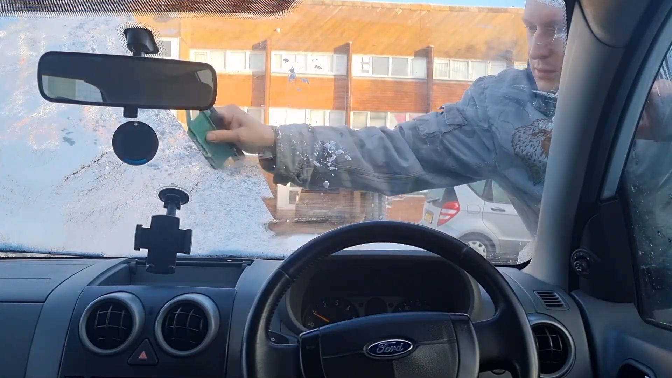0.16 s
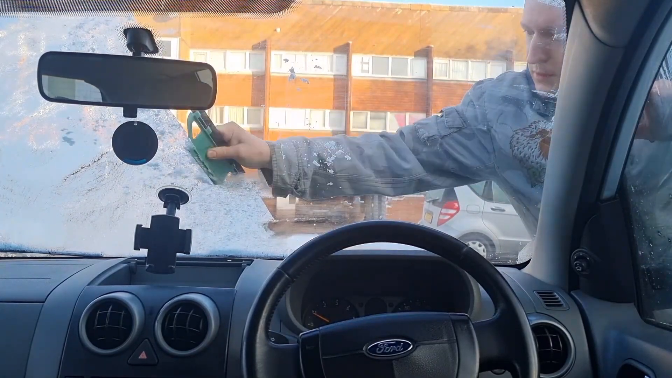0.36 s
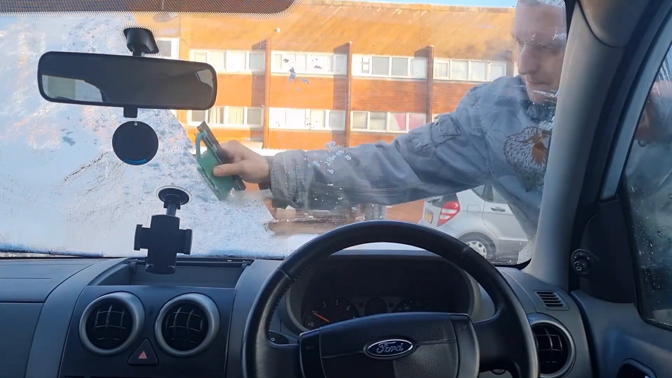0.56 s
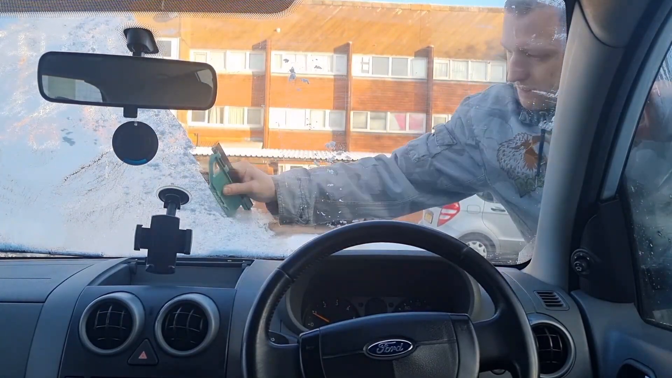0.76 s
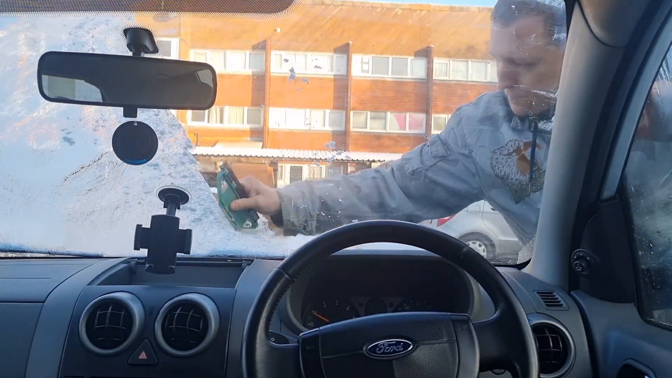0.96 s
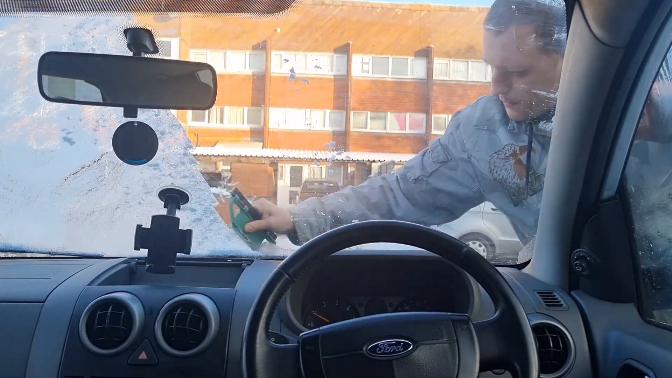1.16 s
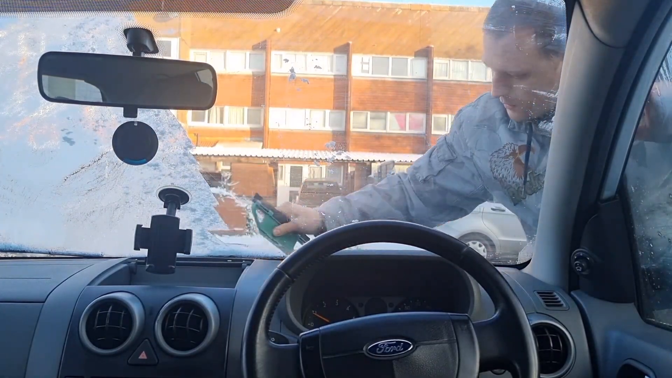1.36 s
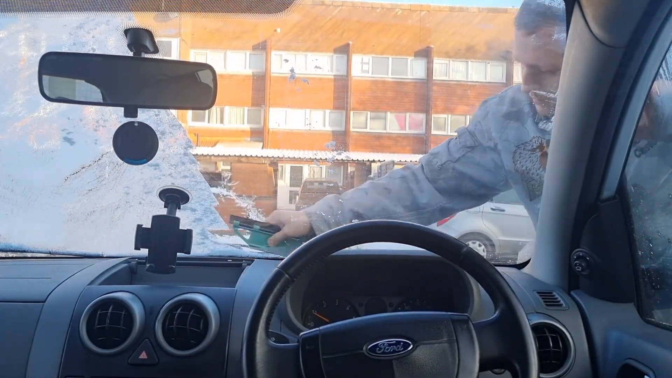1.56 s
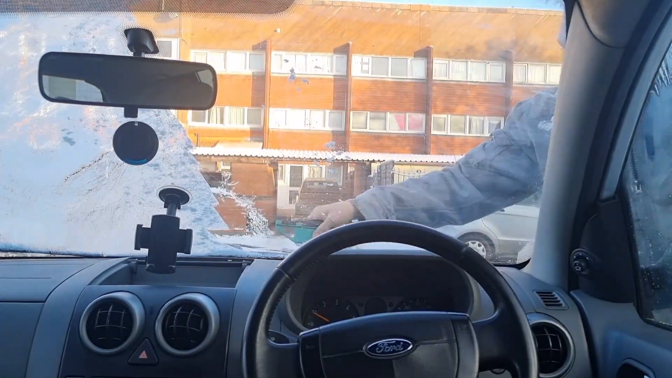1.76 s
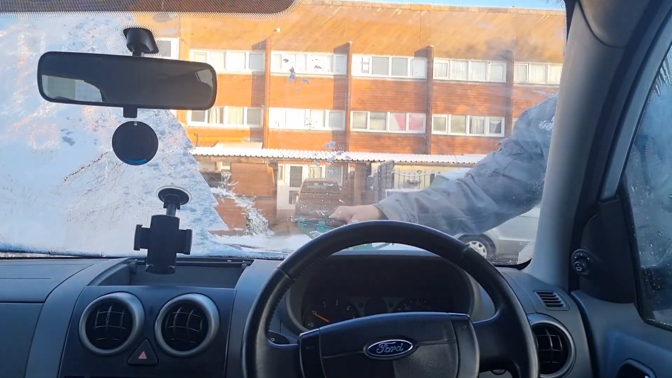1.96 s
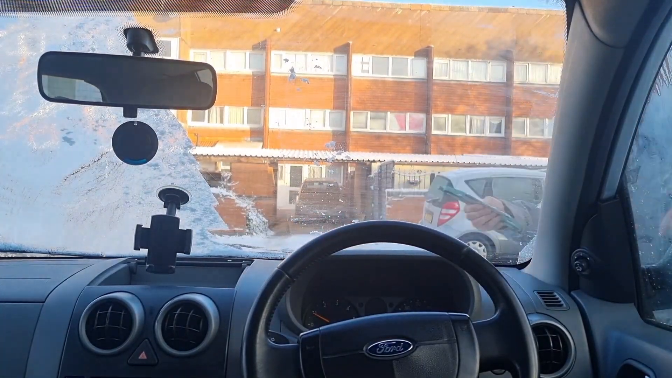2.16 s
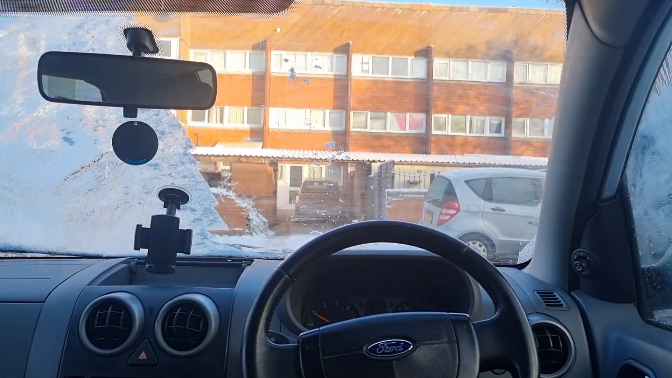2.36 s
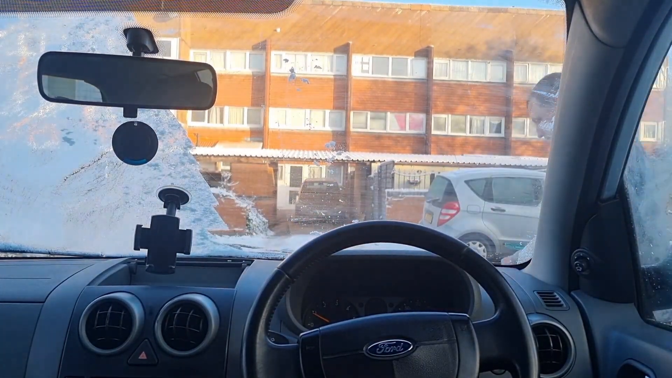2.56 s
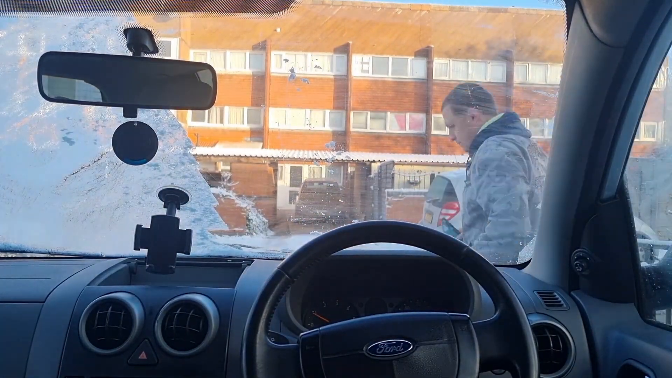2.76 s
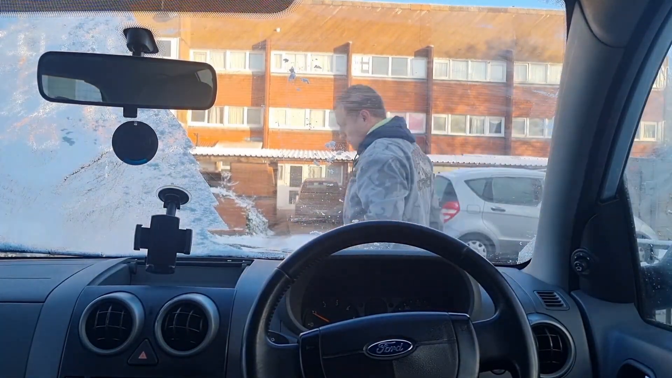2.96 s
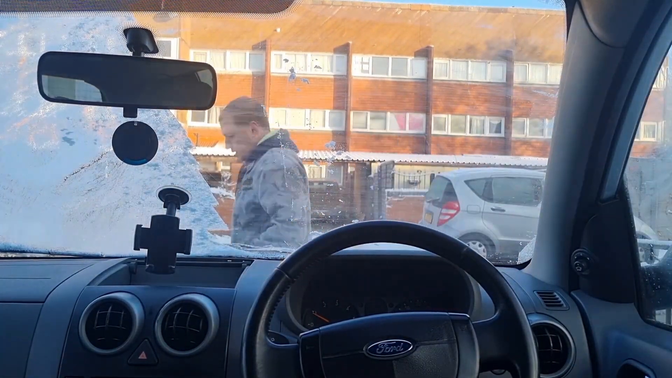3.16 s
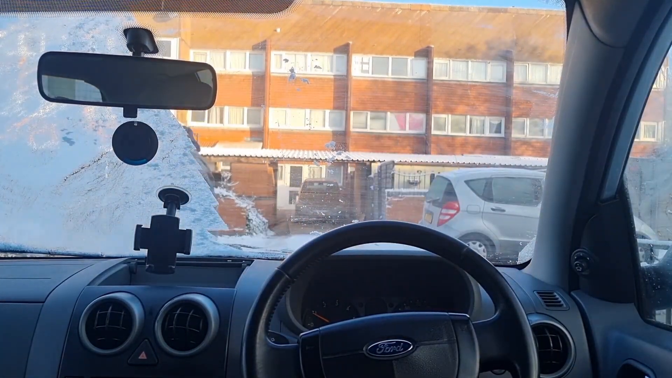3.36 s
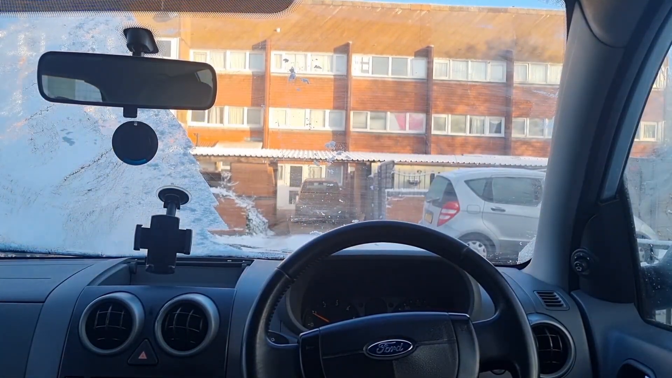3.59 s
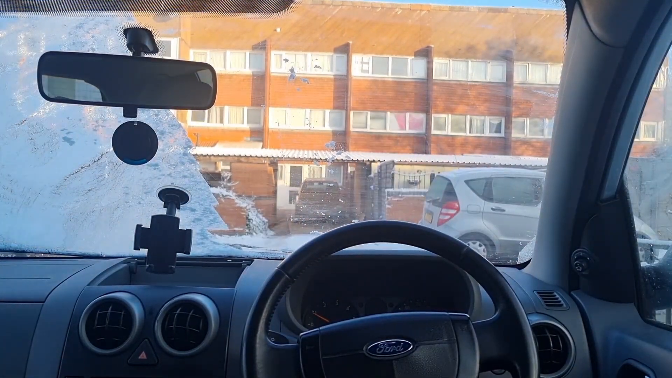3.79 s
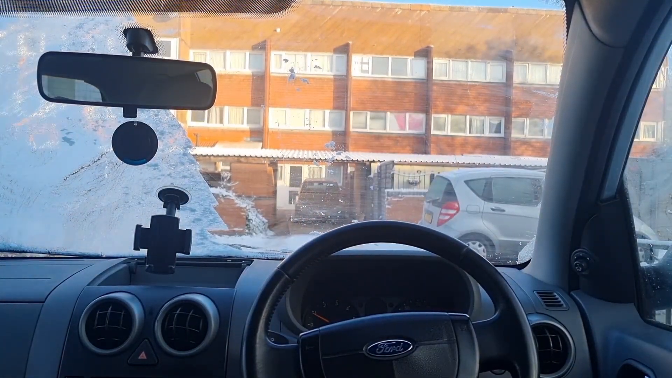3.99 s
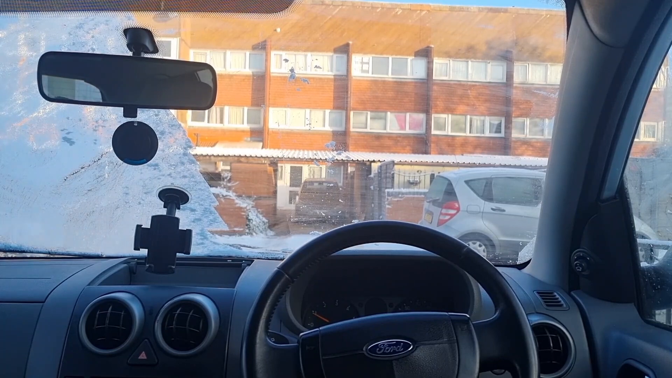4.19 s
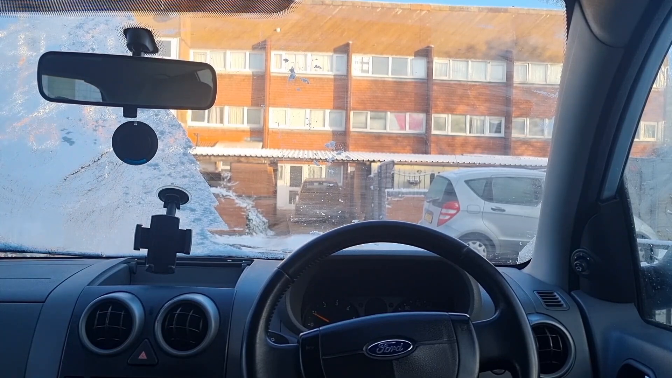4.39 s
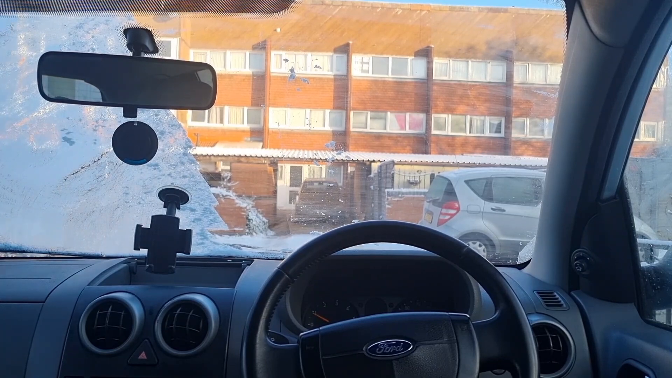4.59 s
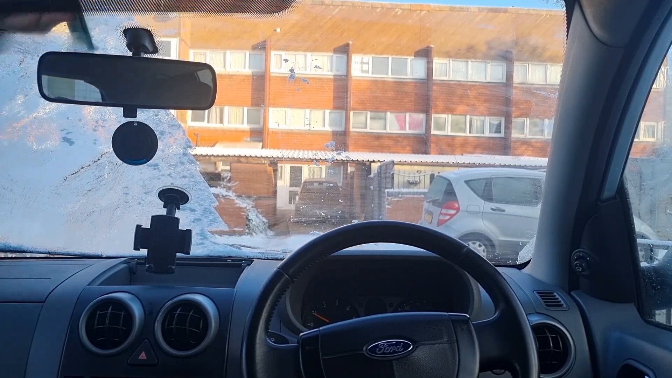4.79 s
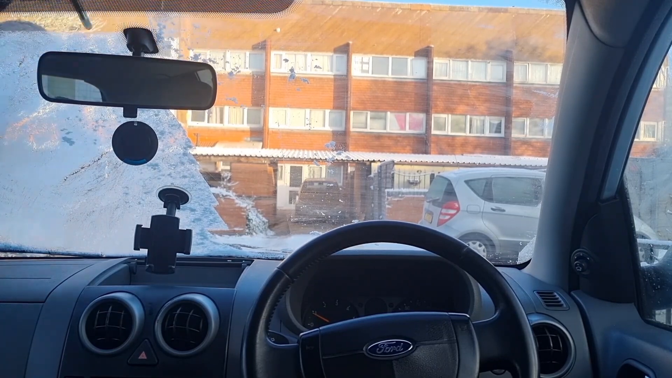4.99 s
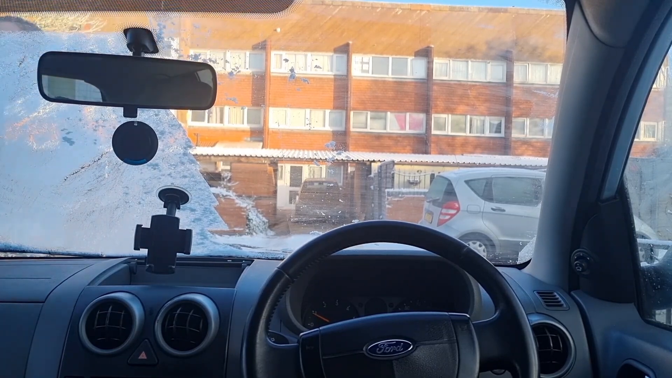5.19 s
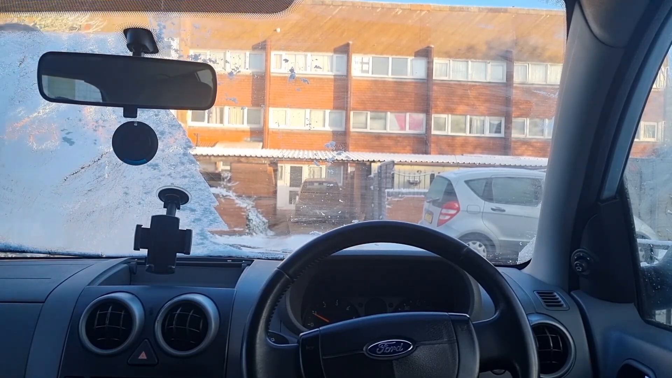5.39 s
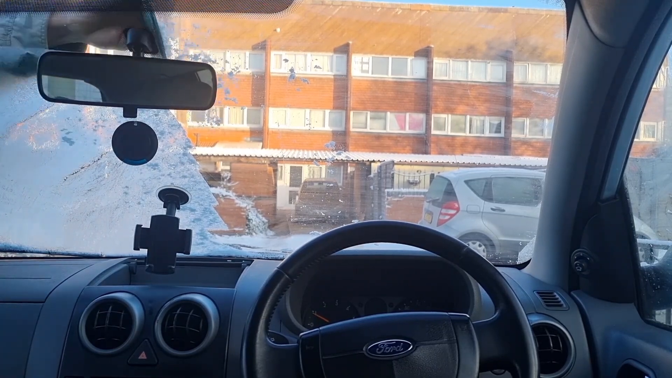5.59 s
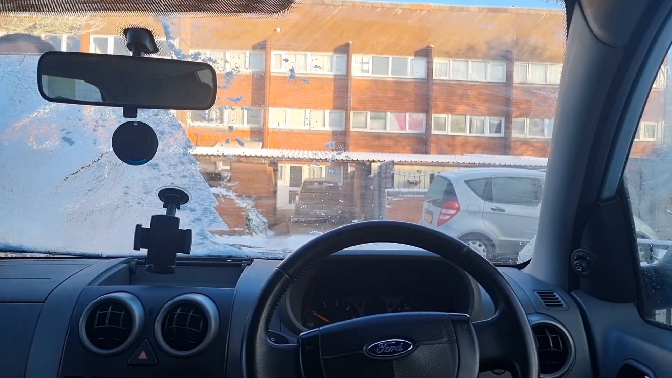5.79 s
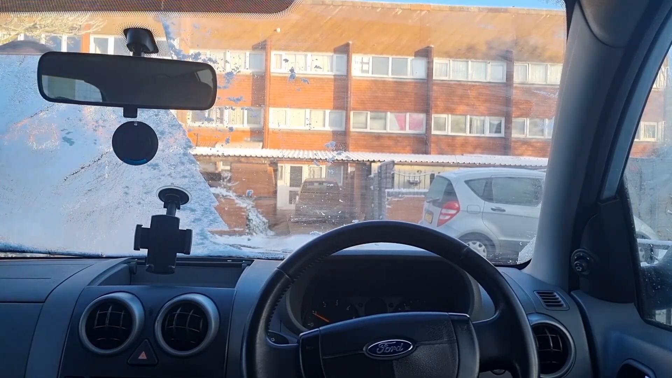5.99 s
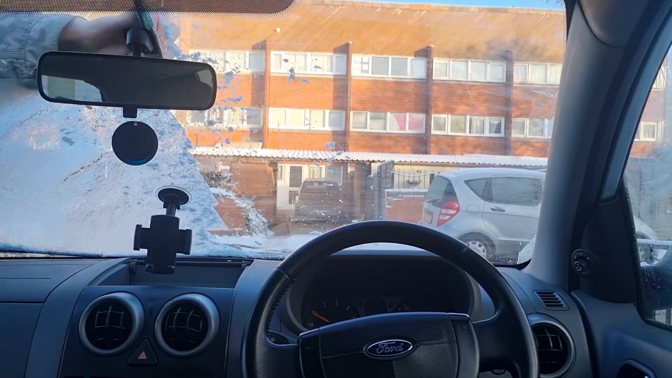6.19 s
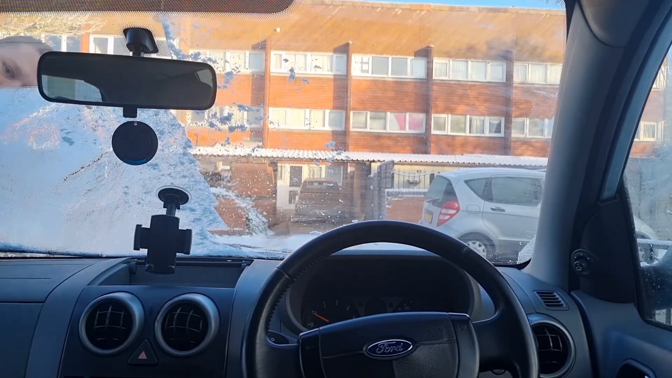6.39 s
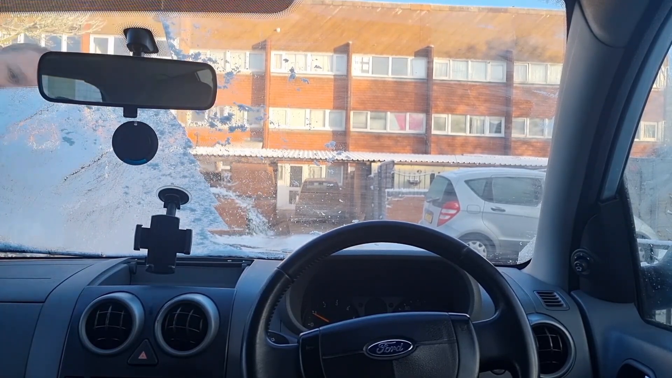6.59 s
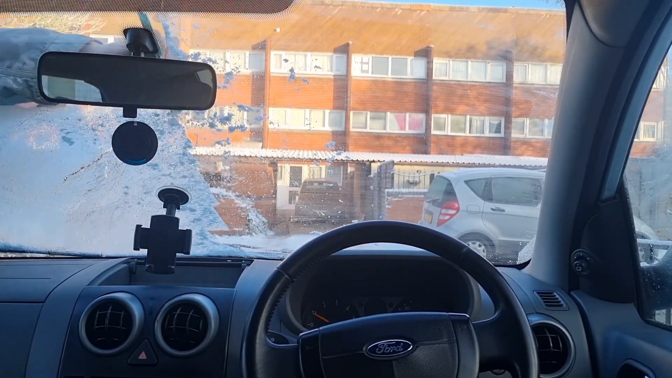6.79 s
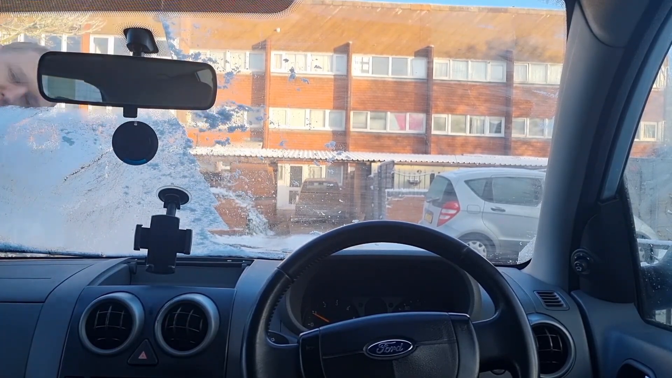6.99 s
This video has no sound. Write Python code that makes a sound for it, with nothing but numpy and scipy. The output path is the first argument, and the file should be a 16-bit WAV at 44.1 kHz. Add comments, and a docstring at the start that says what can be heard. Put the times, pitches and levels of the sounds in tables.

```python
"""A plastic scraper clears frost from a windscreen, heard from inside the idling car.
Random ice fractures, shaped by the blade's speed, ring the glass: quick push-pull strokes, a pause, long sweeps.
Snags on hard ice add cracks, rings and thuds; a double knock on the trim falls near the end of the strokes.
Below lie the engine's wavering firing orders, rumble and thin whine, and the low boom of the cabin air."""
import sys
import numpy as np
from scipy import signal
from scipy.fft import rfft, irfft, next_fast_len
from scipy.io import wavfile
from scipy.ndimage import uniform_filter1d, map_coordinates

SR = 44100
rng = np.random.default_rng(int(sys.argv[2]) if len(sys.argv) > 2 else 0)


def to_wav(s):
    """Save 16-bit WAV."""
    ch = np.atleast_2d(s).T  # columns
    pcm = np.round(np.clip(ch, -1, 1) * 32767)  # PCM
    wavfile.write(sys.argv[1], SR, pcm.astype(np.int16))


N = 310905

# Quick to-and-fro strokes. Each row: start in seconds, push length in seconds, push level in dB,
# return length in seconds, return level in dB.
QUICK_STROKES = [(0.022, 0.085, -38, 0.078, -42.0), (0.193, 0.086, -41.0, 0.079, -47),
                 (0.376, 0.083, -40.5, 0.088, -48.5), (0.57, 0.086, -41, 0.082, -44.5),
                 (0.762, 0.087, -35, 0.093, -41), (0.968, 0.082, -34.0, 0.1, -46),
                 (1.182, 0.094, -36, 0.078, -42), (1.408, 0.094, -33.5, 0.1, -47),
                 (1.63, 0.1, -39.5, 0.1, -55.5), (1.811, 0.1, -46, 0.065, -50.5),
                 (2.008, 0.053, -38, 0.018, -65), (2.081, 0.062, -47.5, 0.062, -51.5),
                 (2.221, 0.057, -40, 0.055, -56.7)]
# Long sweeps and light touches between them. Each row: start in seconds, length in seconds,
# level in dB, fizz in dB re level.
LONG_SWEEPS = [(4.474, 0.075, -50.5, -24.5), (4.537, 0.061, -61, -22), (4.63, 0.51, -38, -11.5),
               (5.122, 0.11, -55.5, -17.7), (5.207, 0.23, -42.5, -11), (5.417, 0.094, -47, -12),
               (5.492, 0.064, -36.5, -12.5), (5.545, 0.33, -39, -7), (5.924, 0.3, -42.5, -8),
               (6.207, 0.28, -36, -8.5), (6.523, 0.3, -39.5, -8.5), (6.812, 0.293, -35.0, -7.5)]
# The blade lands or snags on hard ice. Each row: time in seconds, strength in dB, ring centre in Hz,
# ring trim in dB, thud trim in dB; snags() adds an overall level to crack, ring and thud.
ICE_SNAGS = [(0.044, -12.5, 2450, -11, -30), (0.231, -17, 2300, -9, -14), (1.251, -24.5, 2700, -10, -4.5),
             (4.501, -41, 820, 10, 7), (4.874, -23.5, 2450, -2, -8), (4.946, -21.5, 700, -6.5, -5),
             (5.283, -31, 1200, 6, 1.5), (5.693, -18.5, 1160, -1.5, -6), (6.316, -14, 2400, -7, -20),
             (6.908, -12.5, 2600, -16, -20.5)]
# The scraper bumps the trim below the glass. Each row: time in seconds, level in dB.
TRIM_KNOCKS = [(2.122, -29), (2.132, -23.5)]
# Modes of the trim. Each row: frequency in Hz, level in dB, t60 in seconds.
TRIM_MODES = [(183, -3, 0.082), (358, 0, 0.056), (419, 1.5, 0.064), (538, -3, 0.025), (670, -1.5, 0.028),
              (760, -6, 0.032), (1260, -16, 0.042)]
# Modes of blade and glass pressed together. Each row: frequency in Hz, level in dB, t60 in seconds.
BLADE_MODES = [(687, 3, 0.049), (842, -1.5, 0.057), (1110, -2.5, 0.037), (1190, -7, 0.053), (2050, 0, 0.03),
               (2424, -3, 0.047), (2710, -8, 0.035)]
# Low resonances of the windscreen. Each row: centre in Hz, width in Hz, level in dB.
GLASS_MODES = [(471, 65, -0.5), (770, 93, 5), (878, 165, -3.5), (1221, 237, 5), (1760, 380, -10)]
# Spectra, level set elsewhere. Each row: frequency in Hz, relative density in dB per Hz.
RASP_SPECTRUM = [(300, -31.5), (900, -9.5), (1600, -12), (2100, -1.5), (2600, 2), (3300, -0.5),
                 (4200, -4.5), (5300, -6.5), (7000, -18.5), (8600, -30.5), (12000, -54.5)]  # breaking ice
FIZZ_SPECTRUM = [(2500, -16), (5000, 6), (7000, 9), (8700, 0), (10500, -2.5), (13000, 0), (16000, -1.5)]  # thrown powder
FLEX_SPECTRUM = [(50, -11), (90, 8), (175, -1.5), (300, -18), (600, -47), (2000, -100)]  # windscreen flexing under the blade
THUD_SPECTRUM = [(150, 4.5), (450, -3), (800, -5.5), (1150, -7.5), (1600, -6), (3000, -26), (8000, -60.5)]  # glass answering a snag
RUMBLE_SPECTRUM = [(15, -8.5), (75, 5.5), (150, -5), (225, 0), (275, -9), (345, -2), (430, -9),
                   (650, -12.5), (1400, -28), (1950, -27.5), (2650, -41), (3300, -36.5), (5000, -53),
                   (8500, -65.5)]  # engine in the cabin
WHINE_SPECTRUM = [(1600, -91), (1800, -21), (1870, 8.5), (1940, -23.5), (2200, -89.5)]  # thin whine from the engine bay
# Firing orders at idle. Each row: multiple of the firing rate, level in dB.
FIRING_ORDERS = [(1, -43), (2, -42), (4, -58), (5, -58), (6, -55), (8, -55.5), (12, -52)]
# Stereo balance of the engine. Each row: frequency in Hz, left minus right in dB.
ENGINE_LEAN = [(60, 0), (110, -2), (200, -4.5), (380, -1.5), (700, 0.5), (1290, -1), (2380, 1),
               (4400, -0.5), (8120, -0.5), (15000, 2)]
# Decay of the cabin. Each row: frequency in Hz, t60 in seconds.
CABIN_DECAY = [(200, 0.17), (2500, 0.047), (12000, 0.056)]
# Slow drift of the boom's left-right width. Each row: time in seconds, half the phase gap in radians.
BOOM_HALF_GAP = [(0, 0.76), (2.3, 0.71), (2.55, 1.28), (3.45, 1.32), (3.7, 0.94), (7.05, 0.67)]

# A push bites at once, a return gathers speed slowly; the two overlap at the turn.
PUSH_ATTACK_S, RETURN_ATTACK_S, BRAKE_S, TURN_S = 0.029, 0.043, 0.023, 0.005
SWEEP_ATTACK_S, SWEEP_RELEASE_S = 0.038, 0.038
# The arm presses hardest at this share of a sweep; the fizz peaks later as powder builds up.
PRESS_SHARE, RASP_FALL_DB_PER_S, FIZZ_FALL_DB_PER_S, POWDER_LAG_S = 0.54, 24.5, 48, 0.03
POWDER_FLIGHT_S = 0.003  # thrown powder trails the blade
# The blade drags just before and after a movement; levels re the movement.
DRAG_RASP_DB, DRAG_FIZZ_DB, DRAG_FADE_S = -21, -31, 0.008
RING_FALL_DB_PER_OCT = 28  # with a mode's distance from the ring centre
FIRING_HZ, BOOM_HZ, TOP_HZ = 28.31, 61.6, 15850


def scraping(flex_db=-11, patchy_db=3, count=2):
    """Ice breaks at count places along the blade; uneven frost makes level and glass flutter."""
    rasp, fizz, body = quick_strokes() + long_sweeps()
    uneven = wobble(rate_hz=76)
    bite = rasp * amp(1.5 * uneven)
    powder = fizz * amp(1.1 * uneven)
    push = body * amp(0.51 * uneven + 2.3 * wobble(rate_hz=15))
    out = np.zeros((2, N))
    for _ in range(count):
        ice = fractures(per_second=4500, spread_db=4.5)
        sound = bite * coloured(ice, RASP_SPECTRUM)
        sound += push * unit(filtered(ice, glass))
        sound += powder * coloured(fractures(per_second=3100, spread_db=5.5), FIZZ_SPECTRUM)
        sound += amp(flex_db) * rasp * coloured(ice, FLEX_SPECTRUM)
        out += travelling(patchy(sound, patchy_db))
    return out / np.sqrt(count)


def quick_strokes(fizz_db=-12.0, body_db=-9):
    """Gains of rasp, fizz and body: each stroke is a push, then a lighter return."""
    gains = np.zeros((2, N))
    for start_s, push_s, push_db, return_s, return_db in QUICK_STROKES:
        turn_s = start_s + push_s - TURN_S
        gains += amp(push_db) * movement(start_s, push_s, PUSH_ATTACK_S, BRAKE_S)
        gains += amp(return_db) * movement(turn_s, return_s, RETURN_ATTACK_S, BRAKE_S)
    rasp, fizz = gains
    return np.array([rasp, amp(fizz_db) * fizz, amp(body_db) * rasp])


def long_sweeps(body_db=-6):
    """Gains of rasp, fizz and body: the arm leans into thick frost and eases off, driving the glass harder."""
    gains = np.zeros((2, N))
    for start_s, length_s, db, fizz_db in LONG_SWEEPS:
        past_s = clock() - start_s - PRESS_SHARE * length_s
        rasp_press_db = db - RASP_FALL_DB_PER_S * np.abs(past_s)
        fizz_press_db = db + fizz_db - FIZZ_FALL_DB_PER_S * np.abs(past_s - POWDER_LAG_S)
        press = amp([rasp_press_db, fizz_press_db])
        gains += press * movement(start_s, length_s, SWEEP_ATTACK_S, SWEEP_RELEASE_S)
    rasp, fizz = gains
    return np.array([rasp, fizz, amp(body_db) * rasp])


def movement(start_s, length_s, attack_s, release_s, grip=1.78, powder_speed=0.4, powder_range=0.5):
    """Rasp and fizz, 0-1: the blade gathers speed, holds and brakes; only a fast blade throws powder."""
    t = clock()
    near = np.abs(t - start_s - length_s / 2) < length_s
    since_s, until_s = t[near] - start_s, start_s + length_s - t[near]
    ramp = np.clip(np.minimum(since_s / attack_s, until_s / release_s), 0, 1)
    speed = ramp * (2 - ramp)
    powder = np.clip((speed - powder_speed) / powder_range, 0, 1)
    powder = np.interp(since_s - POWDER_FLIGHT_S, since_s, powder)
    drag = np.exp(np.minimum(np.minimum(since_s, until_s), 0) / DRAG_FADE_S)
    gains = np.zeros((2, N))
    gains[:, near] = np.maximum([speed ** grip, powder],
                                [amp(DRAG_RASP_DB) * drag, amp(DRAG_FIZZ_DB) * drag])
    return gains


def fractures(per_second, spread_db):
    """Ice crystals break at random moments, a few much harder than the rest; rms 1."""
    breaks = rng.random(N) < per_second / SR
    signs = rng.choice([-1, 1], N)
    force = amp(spread_db * np.clip(rng.standard_normal(N), -2.5, 2.5))
    return unit(breaks * signs * force)


def glass(hz):
    """Response of the windscreen: band-pass resonances of alternating sign."""
    response = 0
    for k, (centre_hz, width_hz, db) in enumerate(GLASS_MODES):
        damping = 1j * hz * width_hz
        response = response + (-1) ** k * amp(db) * damping / (centre_hz ** 2 - hz * hz + damping)
    return response


def travelling(x, paths_per_s=7):
    """The moving blade crossfades between new cabin paths, so the fine resonances keep shifting."""
    hop = SR // paths_per_s
    fade = np.sin(np.pi * np.arange(2 * hop) / (2 * hop))
    x, out = np.pad(x, (hop, 2 * hop)), np.zeros((2, N + SR))
    for i in range(0, N + hop, hop):
        heard = cabin(x[i:i + 2 * hop] * fade, direct_db=-12)
        out[:, i:i + heard.shape[1]] += heard
    return out[:, hop:hop + N]


def cabin(x, direct_db):
    """One path to both ears: a direct arrival and a short dense tail, direct_db re tail."""
    hz, t, z = signal.stft(rng.standard_normal((2, SR // 8)), SR, nperseg=256)
    decay = amp(-60 * t / along(CABIN_DECAY, hz)[:, None])
    path = signal.istft(z * decay, SR, nperseg=256)[1]
    path /= np.linalg.norm(path, axis=1, keepdims=True)
    path[[0, 1], rng.integers(0, 20, 2)] += amp(direct_db)
    path /= np.linalg.norm(path, axis=1, keepdims=True)
    return signal.fftconvolve(x[None], path, axes=1)


def snags(ring_db=-6, crack_db=-14.0, thud_db=-4.5, crack_t60_s=0.059, build_s=0.0089):
    """Hard ice swells in noise and gives way: cracks, a short modal ring and a thud in the glass."""
    ring, crack, thud = np.zeros((3, N))
    t = np.arange(SR // 8) / SR
    swell = np.minimum(t / build_s, 1) ** 2
    after_s = np.maximum(t - build_s, 0)
    for time_s, db, centre_hz, tone_db, low_db in ICE_SNAGS:
        first = round((time_s - .006) * SR)  # the swell starts 6 ms early
        at, blow = slice(first, first + len(t)), amp(db) * swell
        for hz, mode_db, t60_s in BLADE_MODES:
            level_db = tone_db + mode_db - RING_FALL_DB_PER_OCT * abs(np.log2(hz / centre_hz))
            ring[at] += blow * amp(level_db - 60 * after_s / t60_s) * np.sin(2 * np.pi * hz * t)
        crack[at] += blow * amp(-60 * after_s / crack_t60_s)
        thud[at] += blow * amp(low_db - 60 * after_s / crack_t60_s)
    ice = fractures(per_second=12000, spread_db=3.0)
    sound = amp(ring_db) * ring
    sound += amp(crack_db) * crack * coloured(ice, RASP_SPECTRUM)
    sound += amp(thud_db) * thud * coloured(ice, THUD_SPECTRUM)
    return cabin(sound, direct_db=5)[:, :N]


def knocks(crunch_db=-3, crunch_t60_s=0.023, onset_s=0.00094):
    """A dull double bump rings the plastic trim's modes, with a low noise crunch of packed snow."""
    out, t = np.zeros(N), np.arange(SR // 5) / SR
    snow = unit(filtered(rng.standard_normal(N), lambda hz: glass(hz) / (1 + 1j * hz / 900) ** 2))
    for time_s, db in TRIM_KNOCKS:
        at = slice(round(time_s * SR), round(time_s * SR) + len(t))
        bump = amp(crunch_db - 60 * t / crunch_t60_s) * snow[at]
        for hz, mode_db, t60_s in TRIM_MODES:
            bump += amp(mode_db - 60 * t / t60_s) * np.sin(2 * np.pi * (hz * t + rng.random()))
        out[at] += amp(db) * bump * (1 - np.exp(-t / onset_s))
    return cabin(out, direct_db=11.5)[:, :N]


def engine(rumble_db=-41, whine_db=-72, waver_db=3, slip_rad=0.091):
    """Unsteady sine firing orders over broad mechanical noise and a narrow noise whine."""
    turn = 2 * np.pi * np.cumsum(FIRING_HZ * (1 + 0.00489 * wobble(rate_hz=5))) / SR
    hum = np.zeros((2, N))
    for k, db in FIRING_ORDERS:
        for side in hum:
            # uneven firing smears the high orders most
            phase = k * (turn + slip_rad * wobble(rate_hz=28)) + 0.89 * wobble(rate_hz=2.044)
            level_db = db + waver_db * np.log10(k) * wobble(rate_hz=6.5)
            side += np.sqrt(2) * amp(level_db) * np.sin(phase)
    noise = np.array([patchy(rng.standard_normal(N), depth_db=1.86) for _ in hum])
    rumble = amp(rumble_db) * coloured(noise, RUMBLE_SPECTRUM)
    whine = amp(whine_db) * coloured(rng.standard_normal((2, N)), WHINE_SPECTRUM)
    return filtered(hum + rumble + whine, lambda hz: amp(np.outer([.5, -.5], along(ENGINE_LEAN, hz))))


def boom(level_db=-34, drift=0.0575, wander_rad=0.31):
    """The cabin's lowest air resonance: a sine of wandering pitch, slightly wavering level and drifting width."""
    turn = 2 * np.pi * np.cumsum(BOOM_HZ * (1 + drift * wobble(rate_hz=14))) / SR
    apart = np.interp(clock(), *np.transpose(BOOM_HALF_GAP)) + wander_rad * wobble(rate_hz=9)
    level = np.sqrt(2) * amp(level_db + 1.7 * wobble(rate_hz=23))
    return level * np.sin([turn + apart, turn - apart])


def patchy(x, depth_db):
    """x with a colour that drifts in patches a few hundred Hz wide."""
    z = signal.stft(x, nperseg=512)[2]
    field = uniform_filter1d(uniform_filter1d(rng.standard_normal(z.shape), 3, 0), 9, 1)
    hz = np.fft.rfftfreq(512, 1 / SR)[:, None]
    depth = depth_db / (1 + hz / 6000)  # the highs stay smoother
    return signal.istft(z * amp(depth * unit(field)), nperseg=512)[1][:N]


def amp(db):
    """Decibels to gain."""
    return 10 ** (np.asarray(db) / 20)


def unit(x):
    """Scale to rms 1."""
    return x / np.sqrt(np.mean(x ** 2) + 1e-20)


def along(points, hz):
    """Read (Hz, value) points on a log axis."""
    f, v = np.transpose(points)
    return np.interp(np.log(hz + 1), np.log(f + 1), v)


def clock():
    """Time of every sample in seconds."""
    return np.arange(N) / SR


def wobble(rate_hz):
    """A smooth random curve, rate_hz knots a second."""
    knots = rng.standard_normal(int(N * rate_hz / SR) + 4)
    return map_coordinates(knots, [clock() * rate_hz])


def filtered(x, response):
    """x times a response of frequency."""
    m = next_fast_len(N + SR // 2)
    return irfft(rfft(x, m) * response(np.fft.rfftfreq(m, 1 / SR)), m)[..., :N]


def coloured(x, spectrum):
    """x shaped by the given spectrum, at rms 1."""
    return unit(filtered(x, lambda hz: amp(along(spectrum, hz))))


def scene():
    """Scraper on the glass, engine and boom below."""
    return scraping() + snags() + knocks() + engine() + boom()


def record(dry):
    """Remove everything from the band limit up."""
    return filtered(dry, lambda hz: hz < TOP_HZ)


dry = scene()
out = record(dry)
to_wav(out)
```